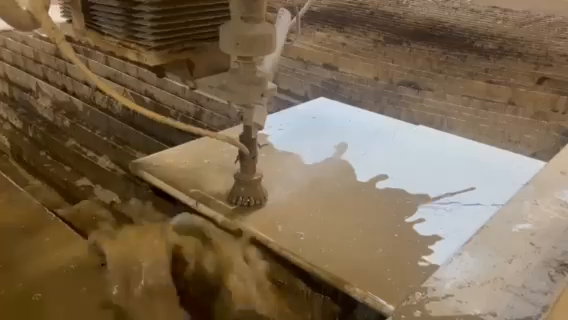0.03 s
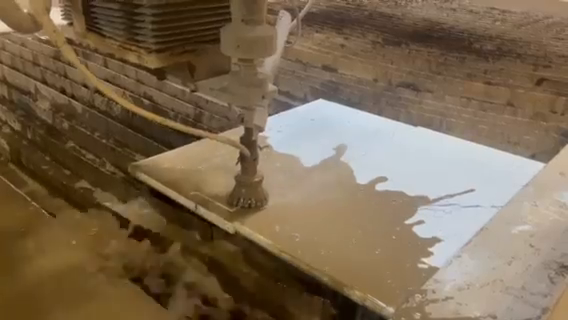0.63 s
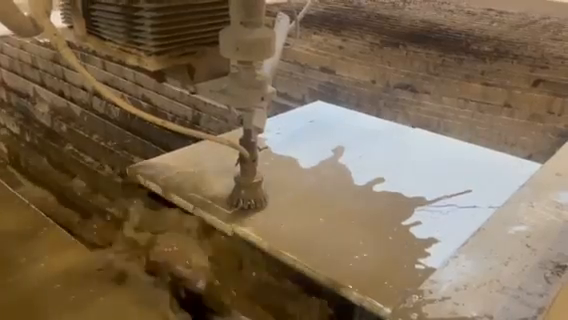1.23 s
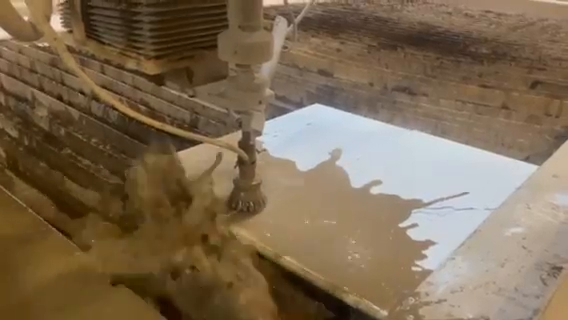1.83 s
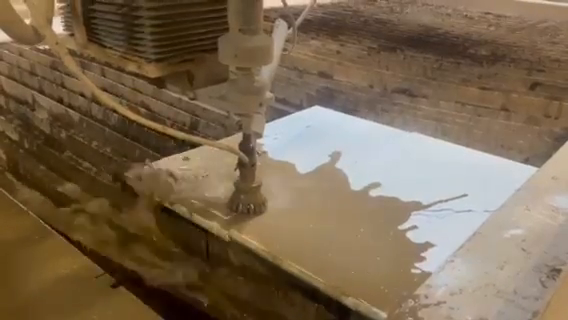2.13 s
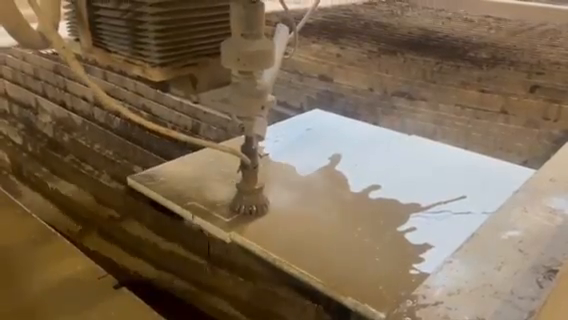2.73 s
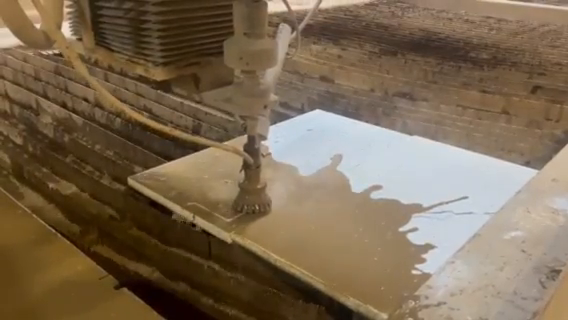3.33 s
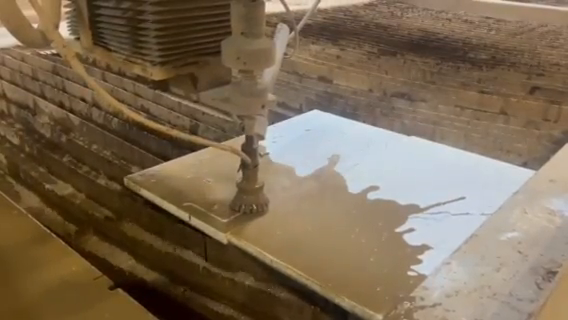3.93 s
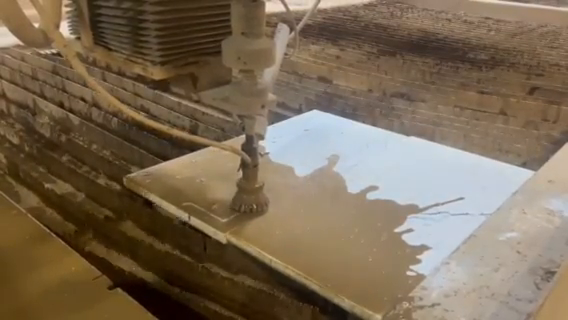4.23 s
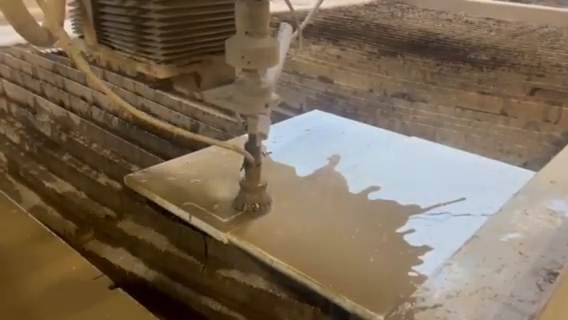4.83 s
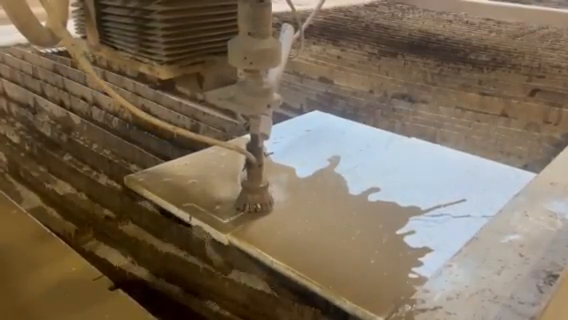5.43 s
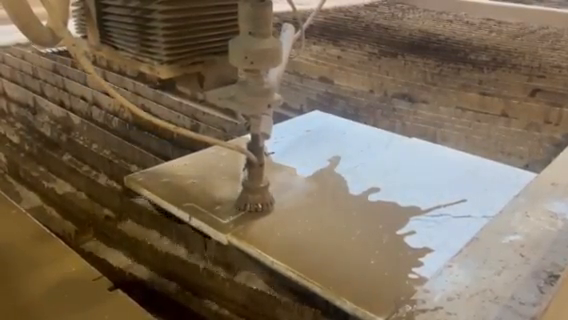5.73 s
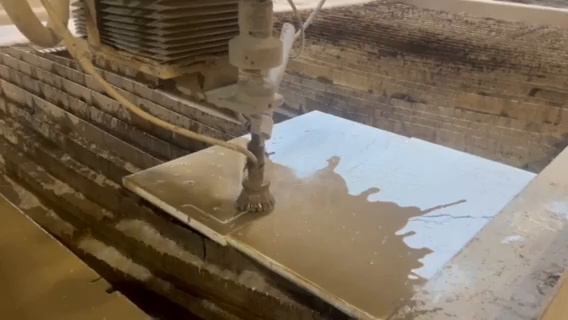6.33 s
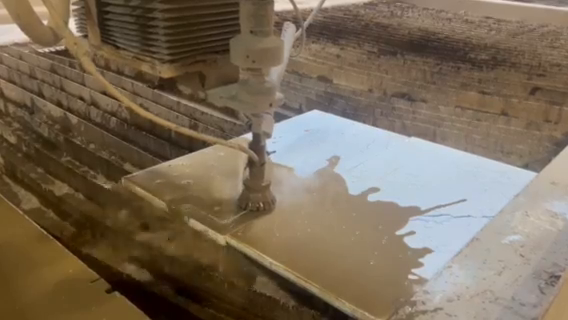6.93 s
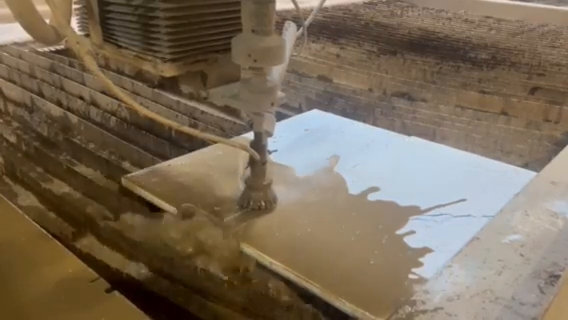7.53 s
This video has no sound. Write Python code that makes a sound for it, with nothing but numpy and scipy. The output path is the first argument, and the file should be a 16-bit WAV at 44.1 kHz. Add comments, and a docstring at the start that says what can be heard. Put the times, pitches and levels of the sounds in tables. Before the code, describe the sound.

A waterjet hisses over a whining pump, splashing at first, then roaring underwater with big gulping bubbles as drops thump the microphone.

```python
"""Waterjet over a muddy tank

In a workshop, with a stereo microphone within reach of the spray, a waterjet cuts a sheet over a tank.
The nozzle hisses in swells, the pump motor whines and the muddy water heaves. For two seconds the jet
throws up splashes; then the surface settles and it roars down in the tank, driving air under water.
Big bubbles gulp, and late on three drops of spray thump on the microphone in quick succession."""
import sys
import numpy as np
from scipy import signal
from scipy.fft import rfft, irfft, next_fast_len
from scipy.io import wavfile
from scipy.ndimage import uniform_filter1d

SR = 44100
rng = np.random.default_rng(int(sys.argv[2]) if len(sys.argv) > 2 else 0)


def transcribe(signal):
    """Save signal, clipped to [-1, 1], as a 16-bit WAV file at the path in sys.argv[1]."""
    frames = np.atleast_2d(signal).T
    limited = np.clip(frames, -1, 1)
    pcm = np.round(limited * 32767).astype(np.int16)
    wavfile.write(sys.argv[1], SR, pcm)


N = 338247
T = np.arange(N) / SR

# noise spectra at the microphone: frequency_hz, relative_db
JET_SPECTRUM = [(500, -27.5), (2300, -16.5), (4000, -10.8), (6000, -6.5), (7300, -3.3), (8400, .6),
                (10800, 3), (13000, 1.5), (15700, 1)]
SPLASH_SPECTRUM = [(300, -56), (650, -8.5), (1100, 1), (1450, 2.5), (1850, 1.5), (2450, -13.5), (3000, -3),
                   (3900, 2.5), (5700, 0.5), (7500, -18), (8300, 4), (15000, -3)]
MACHINE_SPECTRUM = [(100, -8.5), (380, 5.5), (640, -6), (800, 4), (920, 2), (1100, 3.5), (1500, 4),
                    (1900, 0), (2600, 2), (3100, 1.5), (3800, -4), (15000, -10.5)]
RUMBLE_SPECTRUM = [(22, -55), (38, -32), (58, -7.5), (100, -1.5), (170, -1.5), (205, -10), (270, -3),
                   (340, -11.5), (430, -21.5), (900, -30.5)]
ROAR_SPECTRUM = [(30, -55), (125, -19), (170, -3.5), (212, -11), (245, -3), (272, 2), (315, -4), (420, -7),
                 (530, -7.5), (630, -11), (800, -14.5), (1200, -31), (3000, -18.5)]
# swells of hiss at the cut: start_s, length_s, relative_db
HISS_SWELLS = [(-.2, 0.95, -20), (0.7, 0.25, -20.5), (0.96, 0.75, -19.5), (1.813, 0.1, -22.5),
               (2.062, 0.26, -26), (2.715, 0.14, -29), (3.48, 0.34, -28.5), (3.71, 0.29, -21.5),
               (4.357, 0.66, -27), (5.08, 0.35, -33), (5.313, 0.17, -21), (5.53, 0.065, -21.5),
               (6.076, 0.5, -19.5), (6.693, 0.25, -23), (7.174, 0.59, -21.5)]
# brief dips in the hiss: centre_s, half_width_s, depth_db
HISS_DIPS = [(.7, 0.018, 2.5), (1.19, 0.018, 5.5), (1.83, 0.053, 1.5), (2.13, 0.04, 8), (2.73, 0.049, 2),
             (3.09, 0.031, 4), (4.26, 0.093, 7.5), (7.16, 0.028, 2), (7.59, 0.032, 3.5)]
# water thrown up beside the sheet: start_s, length_s, relative_db, slap_share (0-1)
SPLASH_SURGES = [(0.246, .07, -28.5, 0.4), (0.35, 0.056, -25.5, 0.1), (0.435, 0.06, -28, 0.4),
                 (0.55, 0.072, -28.5, 0.4), (.78, 0.082, -34, .2), (1.21, .05, -28, 0.9),
                 (1.28, 0.053, -28, .1), (1.47, 0.037, -33, 0), (1.572, 0.059, -25, 0),
                 (1.702, 0.07, -28, 0.7), (1.89, 0.12, -31.5, 0.2), (3.972, 0.035, -30.5, 0.3)]
# the pump's main whine: time_s, left_db, right_db, left_lead_rad
PUMP_WHINE = [(0, -40, -42.5, 0), (2.2, -41.5, -43.5, 0), (3.5, -38, -36.5, 0), (4, -34, -34, 2),
              (4.8, -35, -32, 2), (5.5, -35.5, -29.5, 2), (6.4, -36.5, -30.5, 2), (7.67, -45, -31, 2.5)]
# the whine throbs harder: centre_s, half_width_s, added_swing_db
WHINE_THROBS = [(2.9, 0.88, 4)]
# lesser pump tones: shaft_multiple, level_db, weaker_db (until the jet goes under)
PUMP_TONES = [(27, -46, 17), (30, -53, 16), (43, -51.5, 12), (46, -54, 8), (57, -55, 1), (60, -55.5, 1),
              (64, -55, 5), (150, -62, 6)]
# machine noise in the workshop: time_s, level_db
MACHINE_LEVEL = [(0, -55), (2, -37.5), (2.5, -37), (3.2, -34), (4.2, -33.5), (5.5, -32), (6.4, -31.5),
                 (7.67, -32.5)]
# water heaving in the tank: time_s, relative_db
RUMBLE_LEVEL = [(0, -39.5), (1.1, -39.5), (2.3, -40.5), (2.75, -47.5), (3.3, -42.5), (4.1, -37.5),
                (5.1, -39), (6.1, -38), (6.5, -33), (6.9, -37), (7.4, -30), (7.67, -27)]
# big bubbles: start_s, level_db, pitch_hz, decay_s
BIG_BUBBLES = [(1.239, -28, 317, 0.011), (1.416, -24.5, 100, 0.031), (1.722, -27, 277, 0.024),
               (2.24, -29, 258, .03), (2.785, -30.5, 271, 0.042), (2.835, -27, 331, 0.02),
               (2.92, -23, 268, 0.038), (2.975, -23, 301, 0.022), (2.98, -20, 170.3, .04),
               (3.172, -24, 293, 0.021), (3.26, -23, 262, 0.026), (3.4, -23, 355, 0.03),
               (3.489, -20, 265, 0.037), (3.56, -21, 274.5, 0.033), (3.745, -23, 166.6, 0.052),
               (3.993, -22, 167, 0.027), (4.442, -26, 300, 0.028), (4.757, -22, 168.4, 0.062),
               (4.98, -24, 275, .04), (5.474, -20.5, 254.7, 0.061), (5.786, -22, 255.5, 0.037),
               (6.574, -23.5, 146, 0.06), (6.618, -15, 89, 0.019), (7.024, -20, 269, 0.017),
               (7.069, -19, 354, 0.013), (7.191, -20, 157, 0.033), (7.244, -14, 154.6, 0.026),
               (7.42, -22, 105, .02), (7.46, -19, 100, 0.01), (7.489, -21, 153, 0.018),
               (7.532, -19, 137, 0.015)]
# the roar eases: centre_s, half_width_s, depth_db
ROAR_LULLS = [(3.34, 0.047, 3.5), (3.68, 0.045, 7), (4.82, 0.031, 5.5), (6.76, 0.16, 3)]
# the roar brightens: centre_s, half_width_s, upper_band_gain_db
ROAR_BOILS = [(3.12, 0.089, 6), (3.95, 0.29, 1), (6.45, 0.34, 7)]
# drops on the microphone: start_s, level_db, pitch_sag_hz, decay_s, hardness (0-1)
MIC_DROPS = [(6.3065, -6.6, 760, .035, 1), (6.3432, -12.3, 900, .045, .45), (6.3598, -18.5, 800, .015, .5)]
# how alike the two microphone ports sound: frequency_hz, likeness (0-1)
PORT_LIKENESS = [(100, .985), (380, .92), (600, .55), (1100, .68), (1500, .1), (2000, .7), (3300, .45),
                 (5000, .52), (7000, .6), (8000, .99), (8600, .997), (9800, .78), (12000, .97),
                 (13800, .72), (15100, .999)]
# phase between the ports: frequency_hz, left_lead_rad
PORT_LEAD = [(600, 0), (1050, .6), (1450, -1), (1900, .1), (3000, 1.1), (5000, .3), (6800, -1.4),
             (7900, -3), (8700, -3.25), (11300, -6.1), (12900, -6.5), (15100, -9.42)]
# balance between the ports: frequency_hz, left_minus_right_db
PORT_BALANCE = [(400, 0.3), (700, -1.5), (1400, -0.7), (1900, 1), (5000, 2.5), (8000, 0)]
# edge below which the sound narrows to mono: time_s, edge_hz
MONO_BASS_EDGE = [(0, 900), (2, 770), (3.3, 680), (4, 420), (5, 190), (5.6, 70), (7.67, 40)]

SUBMERGE_S, FILL_IN_S = 2.753, 0.67  # the jet goes under; roar treble and pump tones then fill in


def gain_of(db):
    """Decibels to amplitude."""
    return 10 ** (np.asarray(db) / 20)


def unit_rms(x):
    """Scales to rms 1."""
    return x / np.sqrt(np.mean(x ** 2) + 1e-20)


def at_hz(points, hz):
    """Reads a curve on a log-frequency axis."""
    frequency, value = np.transpose(points)
    return np.interp(np.log(hz + 1), np.log(frequency + 1), value)


def follow(rows):
    """The columns of a time curve at every sample."""
    times, *columns = np.transpose(rows)
    return [np.interp(T, times, column) for column in columns]


def add(mix, start_s, sound):
    """Adds a sound into the mix at a time."""
    part = mix[round(start_s * SR):][:len(sound)]
    part += sound[:len(part)]


def swell(start_s, length_s, attack_s, release_s):
    """Envelope that rises, holds and dies away."""
    rise = np.clip((T - start_s) / attack_s, 0, 1)
    return rise * np.exp(-np.maximum(T - start_s - length_s, 0) / release_s)


def humps(rows):
    """Smooth brief changes of level, in dB."""
    return sum(db * np.exp(-((T - centre_s) / half_s) ** 2) for centre_s, half_s, db in rows)


def wander(rate_hz):
    """Smooth random drift of rms 1, up to about the given rate."""
    hz = np.fft.rfftfreq(N, 1 / SR)
    slow = np.exp(-(hz / rate_hz) ** 2) * (hz > 0)
    return unit_rms(irfft(rfft(rng.standard_normal(N)) * slow, N))


def turbulence(impacts_per_s, spread_db, impact_share):
    """Two unrelated streams of smooth rush mixed with droplet impacts of uneven size."""
    size = gain_of(spread_db * np.minimum(rng.exponential(1, (2, N)), 4))
    impacts = size * rng.choice([-1, 1], (2, N)) * (rng.random((2, N)) < impacts_per_s / SR)
    rush = rng.standard_normal((2, N))
    return np.sqrt(1 - impact_share) * rush + np.sqrt(impact_share) * unit_rms(impacts)


def shimmer(streams, patchy_db):
    """Echoes off moving water lift and hollow out patches about 250 Hz wide and 0.1 s long."""
    spectra = signal.stft(streams, SR, nperseg=1024, noverlap=768)[2]
    patches = uniform_filter1d(rng.standard_normal(spectra.shape[1:]), size=6, axis=0)
    patches = unit_rms(uniform_filter1d(patches, size=20, axis=1))
    return signal.istft(spectra * gain_of(patchy_db * patches), SR, nperseg=1024, noverlap=768)[1][:, :N]


def walls(streams, echo):
    """Short echoes off the steel walls comb the spectrum finely."""
    lags = rng.integers(SR // 400, SR // 40, 12)
    return streams + echo * sum(rng.choice([-1, 1]) * np.roll(streams, lag, axis=1) for lag in lags)


def at_ports(streams, spectrum):
    """Colours two unrelated streams and spreads them over the microphone ports; rms 1."""
    size = next_fast_len(N)
    hz = np.fft.rfftfreq(size, 1 / SR)
    common, own = rfft(streams, size)
    likeness = np.clip(at_hz(PORT_LIKENESS, hz), 0, 1)
    tilt = gain_of(at_hz(PORT_BALANCE, hz) / 2)
    right = (likeness * common + np.sqrt(1 - likeness ** 2) * own) * np.exp(-1j * at_hz(PORT_LEAD, hz))
    ports = np.array([common * tilt, right / tilt]) * gain_of(at_hz(spectrum, hz))
    return unit_rms(irfft(ports, size)[:, :N])


def jet(gain_db=2.5, steady_db=-30, sputter_db=1.15, drift_db=1.0):
    """Fine spray hisses at the cut in swells and sputters as the abrasive feeds unevenly."""
    spray = shimmer(turbulence(impacts_per_s=3000, spread_db=3.5, impact_share=.13), patchy_db=1.4)
    power = gain_of(steady_db) ** 2
    for start_s, length_s, db in HISS_SWELLS:
        power += (gain_of(db) * swell(start_s, length_s, attack_s=0.16, release_s=0.14)) ** 2
    uneven_db = sputter_db * wander(rate_hz=50) + drift_db * wander(rate_hz=9)
    return at_ports(spray, JET_SPECTRUM) * np.sqrt(power) * gain_of(gain_db - humps(HISS_DIPS) + uneven_db)


def splash(gain_db=3.0, patter_db=-32, settle_start_s=2.03, settle_decay_s=0.37, fizz_hz=2400):
    """Thrown water patters back until the surface settles; each surge adds fine fizz and some slap."""
    patter = shimmer(turbulence(impacts_per_s=1800, spread_db=3.2, impact_share=.22), patchy_db=1.9)
    water = at_ports(walls(patter, echo=0.17), SPLASH_SPECTRUM)
    fizz = signal.sosfiltfilt(signal.butter(2, fizz_hz, "high", fs=SR, output="sos"), water)
    slap = water - fizz
    steady = gain_of(patter_db) * np.exp(-np.maximum(T - settle_start_s, 0) / settle_decay_s)
    fizz_power, slap_power = steady ** 2, steady ** 2
    for start_s, length_s, db, slap_share in SPLASH_SURGES:
        surge = gain_of(db) * swell(start_s, length_s, attack_s=0.018, release_s=0.043)
        fizz_power += surge ** 2
        slap_power += (slap_share * surge) ** 2
    slosh_db = 1.1 * wander(rate_hz=14)
    return (np.sqrt(fizz_power) * fizz + np.sqrt(slap_power) * slap) * gain_of(gain_db + slosh_db)


def pump(shaft_hz=19.842, waver_hz=5, whine_waver_db=0.2, tone_waver_db=2.0, throb_db=0.13):
    """Tones on multiples of the motor shaft speed, the fiftieth a strong whine throbbing once a turn."""
    shaft = 2 * np.pi * np.cumsum(shaft_hz * (1 + .0004 * wander(rate_hz=2))) / SR
    submerged = np.clip((T - SUBMERGE_S) / FILL_IN_S, 0, 1)
    undertone = gain_of(-15.95 + 6.3 * submerged)  # an octave below the whine
    left_db, right_db, lead = follow(PUMP_WHINE)
    shift = np.array([lead, np.zeros(N)])
    whine = gain_of([left_db, right_db]) * (np.sin(50 * shaft + shift)
                                            + undertone * np.sin(25 * shaft + shift))
    swing_db = throb_db + humps(WHINE_THROBS)
    whine *= gain_of(whine_waver_db * wander(waver_hz) + swing_db * np.sin(shaft))
    tones = np.zeros((2, N))
    for multiple, db, weaker_db in PUMP_TONES:
        # the room gives each tone its own phase at each port
        phase = 2 * np.pi * rng.random() + .6 * rng.standard_normal((2, 1))
        level_db = db - weaker_db * (1 - submerged) + tone_waver_db * wander(waver_hz)
        tones += gain_of(level_db) * np.sin(multiple * shaft + phase)
    return np.sqrt(2) * (whine + tones)


def machine_noise():
    """The broad din of machinery builds in the workshop and echoes off the walls."""
    din = shimmer(walls(rng.standard_normal((2, N)), echo=0.12), patchy_db=2.0)
    return gain_of(follow(MACHINE_LEVEL)[0]) * at_ports(din, MACHINE_SPECTRUM)


def rumble(gain_db=2.5, lurch_db=1.36):
    """The mass of water heaves against the tank."""
    deep = at_ports(rng.standard_normal((2, N)), RUMBLE_SPECTRUM)
    return deep * gain_of(follow(RUMBLE_LEVEL)[0] + gain_db + lurch_db * wander(rate_hz=14))


def bubble(hz, decay_s, rise=0.032):
    """A pocket of air rings and climbs a little in pitch as it nears the surface."""
    age = np.arange(0, 6, 1 / (decay_s * SR))  # in decay times
    phase = 2 * np.pi * hz * decay_s * (age + rise * age ** 2 / 2)
    return np.sin(phase) * np.exp(-age) * (1 - np.exp(-6 * age))


def gulps(fragment_db=-11, fragments=4):
    """Big pockets of air well up, each shedding a few smaller, higher bubbles as it rings."""
    out = np.zeros(N)
    for start_s, db, hz, decay_s in BIG_BUBBLES:
        add(out, start_s, gain_of(db) * bubble(hz, decay_s))
        for lateness, octaves in rng.random((fragments, 2)):
            fragment = gain_of(db + fragment_db) * bubble(hz * 2 ** octaves, decay_s / 2)
            add(out, start_s + 2 * decay_s * lateness, fragment)
    return out


def roar(start_db=-30, growth_db_per_s=0.18, attack_s=0.16, bubble_db=-7, dull_hz=500):
    """The jet drives air deep under water, where a cloud of bubbles roars, dull at first, then fuller."""
    cloud = np.zeros((2, N))
    for hz in np.geomspace(140, 900, num=16):
        births = rng.random((2, N)) * (rng.random((2, N)) < 40 / SR)  # 40 a second in each stream
        cloud += np.sqrt(hz) * signal.oaconvolve(births, bubble(hz, decay_s=3.9 / hz)[None])[:, :N]
    boil = at_ports(rng.standard_normal((2, N)) + gain_of(bubble_db) * unit_rms(cloud), ROAR_SPECTRUM)
    age_s = np.maximum(T - SUBMERGE_S, 0)
    dull = signal.sosfiltfilt(signal.butter(4, dull_hz, fs=SR, output="sos"), boil)
    upper = (boil - dull) * np.minimum(age_s / FILL_IN_S, 1) * gain_of(humps(ROAR_BOILS))
    level_db = start_db + growth_db_per_s * age_s - humps(ROAR_LULLS)
    return (dull + upper) * np.minimum(age_s / attack_s, 1) * gain_of(level_db)


def drops(crack_db=-7, crack_hz=3600, crack_s=.00016, push_db=-12, push_s=.009):
    """Drops crack on the microphone and push air in its ports; each thump sags as the water spreads."""
    floor_hz, sag_s, soft_s, port_lag_s = 24, .0015, .001, .00016
    out, t = np.zeros((2, N)), np.arange(SR // 8) / SR
    push = gain_of(push_db) * t / push_s * (2 - t / push_s) * np.exp(-t / push_s)
    for start_s, db, sag_hz, decay_s, hardness in MIC_DROPS:
        cycles = np.cumsum(floor_hz + sag_hz / (1 + t / sag_s)) / SR
        onset = 1 - (1 - hardness) * np.exp(-t / soft_s)
        thump = -np.cos(2 * np.pi * cycles) * np.exp(-(t / decay_s) ** 2) * onset
        crack = -hardness * gain_of(crack_db) * np.sin(2 * np.pi * crack_hz * t) * np.exp(-t / crack_s)
        # the crack runs through the case to both ports at once; the air reaches the right one later
        for port, lag_s in zip(out, (0, port_lag_s)):
            add(port, start_s, gain_of(db) * crack)
            add(port, start_s + lag_s, gain_of(db) * (thump + push))
    return out


def scene():
    """The workshop as heard at the two microphone ports, beside the tank."""
    return jet() + splash() + pump() + machine_noise() + rumble() + gulps() + roar() + drops()


def record(dry):
    """The bass starts in mono and slowly widens; the highest treble is cut off."""
    mid, side = (dry[0] + dry[1]) / 2, (dry[0] - dry[1]) / 2
    hz, times, spectra = signal.stft(side, SR, nperseg=1024)
    edge_hz = np.interp(times, *np.transpose(MONO_BASS_EDGE))
    above = (hz[:, None] / edge_hz) ** 4
    side = signal.istft(spectra * above / (1 + above), SR, nperseg=1024)[1][:N]
    low_pass = signal.firwin(511, cutoff=15780, window=("kaiser", 9), fs=SR)
    return signal.oaconvolve(np.array([mid + side, mid - side]), low_pass[None], "same")


dry = scene()
out = record(dry)
transcribe(out)
```